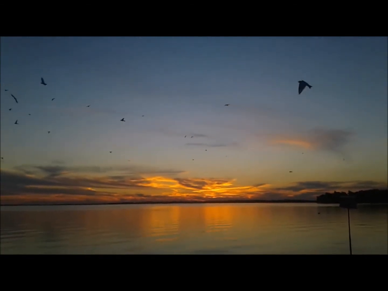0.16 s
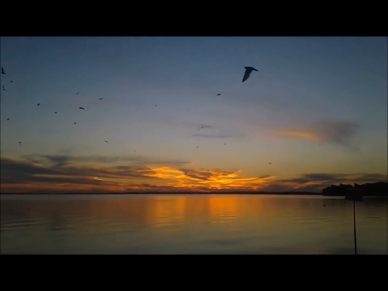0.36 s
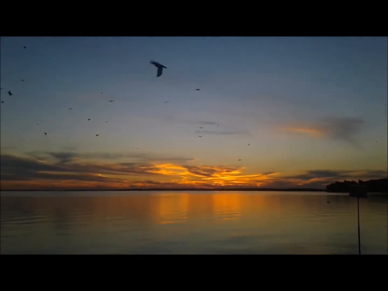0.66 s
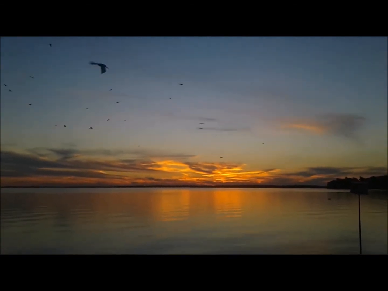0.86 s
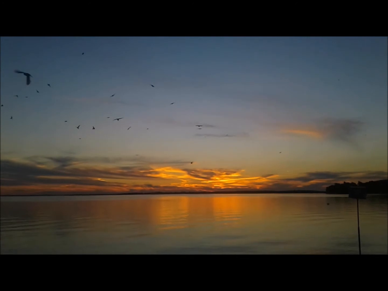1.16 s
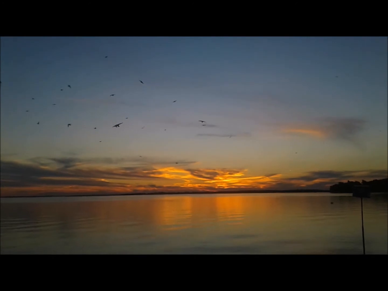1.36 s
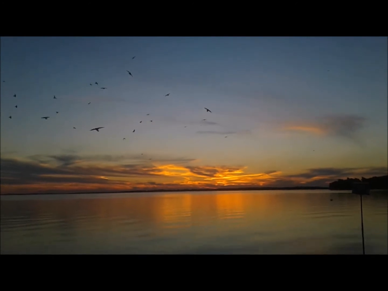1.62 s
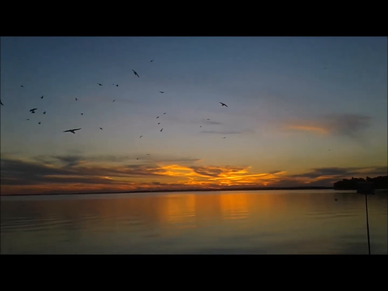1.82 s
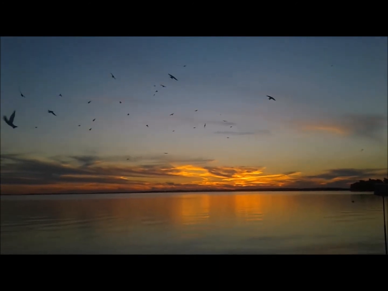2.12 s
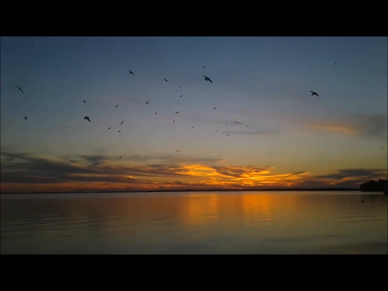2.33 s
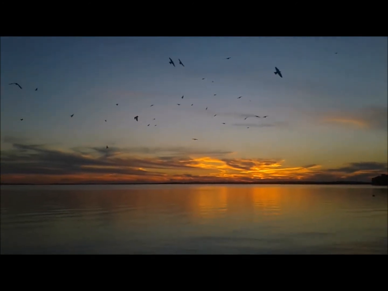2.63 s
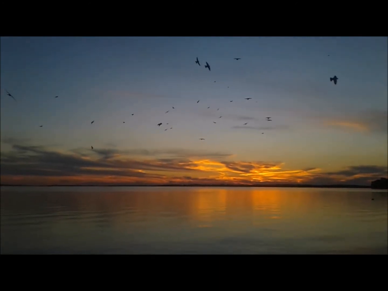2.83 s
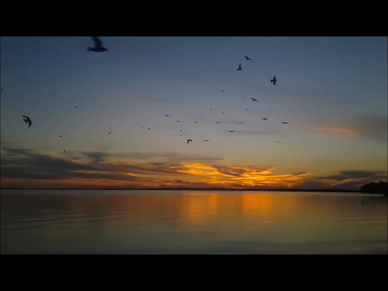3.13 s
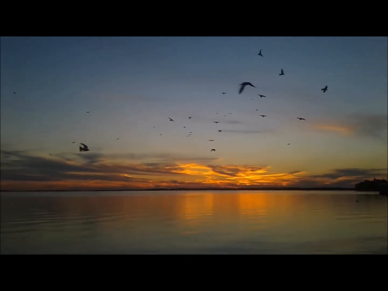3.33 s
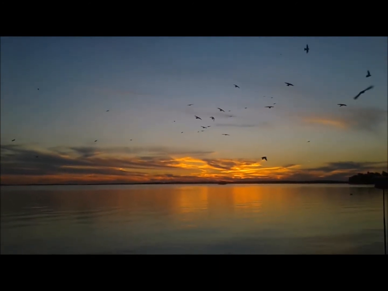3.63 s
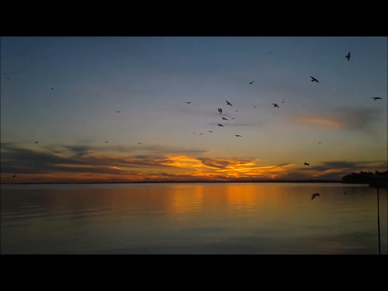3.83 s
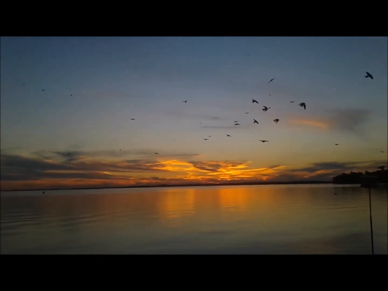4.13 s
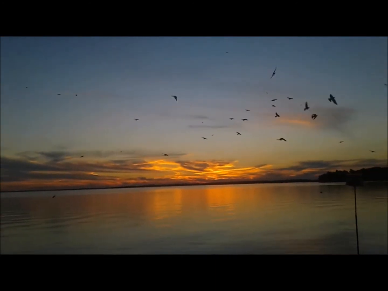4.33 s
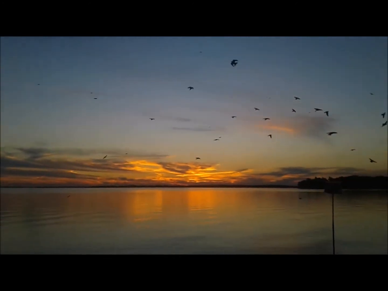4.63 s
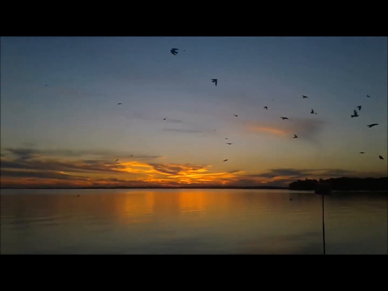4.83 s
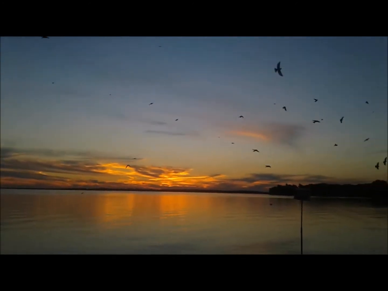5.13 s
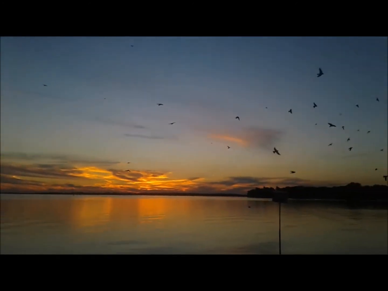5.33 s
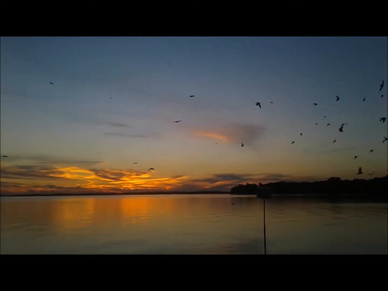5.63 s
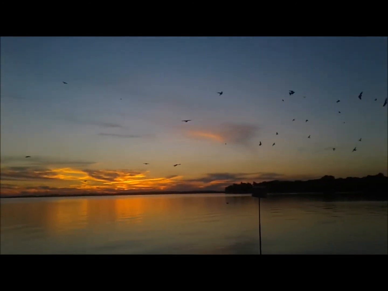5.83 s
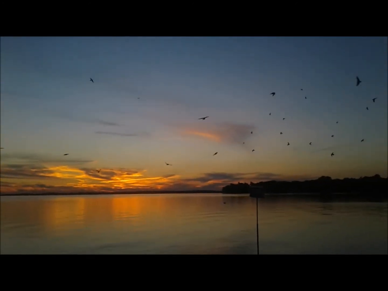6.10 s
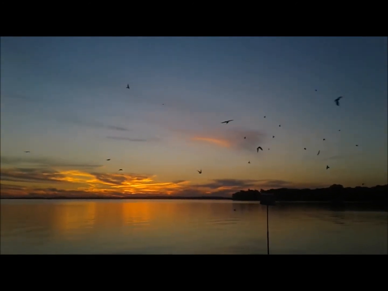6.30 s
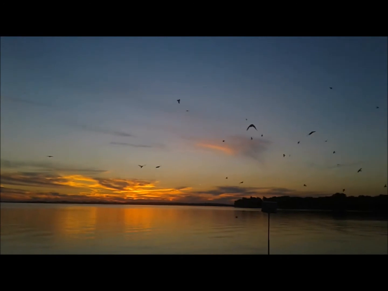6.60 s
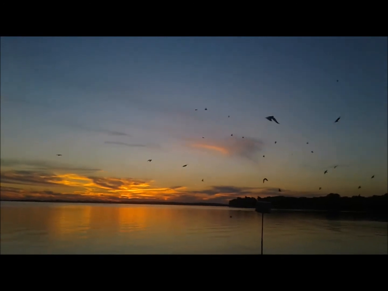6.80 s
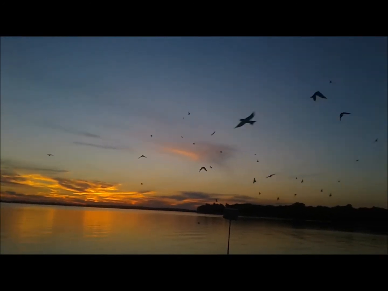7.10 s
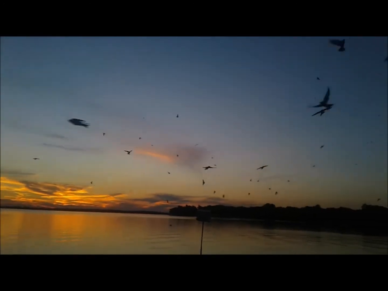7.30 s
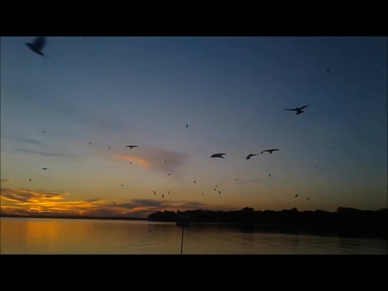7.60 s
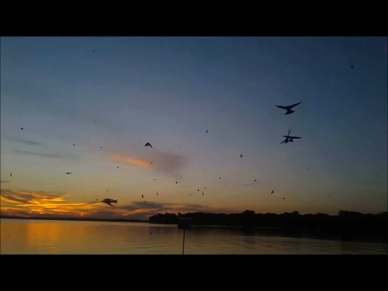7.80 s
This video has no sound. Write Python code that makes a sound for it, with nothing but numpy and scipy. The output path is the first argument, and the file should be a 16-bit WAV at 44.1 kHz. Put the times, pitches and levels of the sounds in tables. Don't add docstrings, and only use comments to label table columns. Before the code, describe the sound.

Dozens of small swallow-like birds call without pause over a calm lake in the open air. Short, burry, falling chirps overlap near and far, mixed with brief thin whistles and harsh rasps. The calls grow denser and louder toward the end, where rasps repeat regularly and come closer. Water and shore return a faint wash. Very quiet distant motor hum and low rumble lie beneath. Small stereo microphone in the middle of the flock, slight hiss.

```python
import sys
import numpy as np
from scipy import signal
from scipy.fft import rfft, irfft, next_fast_len
from scipy.io import wavfile
from scipy.ndimage import uniform_filter1d, map_coordinates

SR = 44100
rng = np.random.default_rng(int(sys.argv[2]) if len(sys.argv) > 2 else 0)


def level_to_linear(level):
    exponent = np.asarray(level, float) / 20
    return 10 ** exponent


def persist_wave(psi):
    counts = np.round(np.clip(psi, -1, 1) * 32767).astype(np.int16)
    wavfile.write(sys.argv[1], SR, np.atleast_2d(counts).T)


N = 350595


def curve(table, hz):
    points_hz, values = np.transpose(table)
    return np.interp(np.log(np.maximum(hz, 1)), np.log(points_hz), values)


def colour(x, table, share=1):
    length = x.shape[-1]
    size = next_fast_len(length)
    hz = np.arange(size // 2 + 1) * SR / size
    return irfft(rfft(x, size) * level_to_linear(share * curve(table, hz)), size)[..., :length]


def level(x, db):
    return x * level_to_linear(db) / np.sqrt(np.mean(x ** 2))


def walk(rate_hz, size):
    hold = max(int(SR / rate_hz), 1)
    steps = np.repeat(rng.standard_normal(size // hold + 1), hold)
    return 1.3 * uniform_filter1d(uniform_filter1d(steps, hold), hold)[:size]


def swell(u, rise, fall):
    opening = np.sin(np.pi / 2 * np.clip(u / rise, 0, 1)) ** 2
    closing = np.sin(np.pi / 2 * np.clip((1 - u) / fall, 0, 1)) ** 2
    return opening * closing


def seconds():
    return np.arange(N) / SR


# (frequency [Hz], level [dB per Hz])
RUMBLE_COLOUR = [(15, -53), (25, -25), (53, -10), (91, -3.5), (134, -7.5), (196, -5.5), (329, -1),
                 (400, -6.5), (505, -8), (563, -10.5), (749, -10.5), (1240, -13.5), (1400, -23),
                 (1530, -18.5), (1800, -33), (2340, -70), (3960, -120)]
# (frequency [Hz], left-right correlation [0-1])
LIKENESS = [(25, 0.4), (60, 0.85), (150, 0.75), (350, 0.94), (700, 0.49), (1500, 0.029)]


def rumble():
    size = next_fast_len(N)
    hz = np.arange(size // 2 + 1) * SR / size
    like = np.clip(curve(LIKENESS, hz), 0, 1)
    noise = rfft(rng.standard_normal((2, size))) * level_to_linear(curve(RUMBLE_COLOUR, hz))
    mid, side = noise * np.sqrt([1 + like, 1 - like])
    ports = np.array([mid + side, 0.89 * (mid - side)])
    growth_db = 2.5 * np.arange(N) / N
    out = 0
    for octave in np.arange(4, 12):
        band = np.clip(1 - abs(np.log2(np.maximum(hz, 1)) - octave), 0, 1)
        drift_db = 0.65 * walk(2.5, N) + (octave > 7) * growth_db
        out = out + level_to_linear(drift_db) * irfft(band * ports, size)[:, :N]
    return level(out, -49.5)


# (frequency [Hz], level [dB], pitch wander [Hz])
HUM = [
    (116.6, -64, 7.2),
    (239.8, -57.5, 0.4),
    (315.2, -62, 5.12),
    (612, -71.5, 6.),
    (166, -66.5, 4),
    (768, -69.5, 12.),
    (939, -70, 14),
]


def engines():
    out = 0
    for hz, db, wander_hz in HUM:
        strength = np.sqrt(2) * level_to_linear(db + 3.74 * walk(8.3, N))
        out = out + strength * np.sin(2 * np.pi * np.cumsum(hz + wander_hz * walk(1.5, N)) / SR)
    return out


def shore(birds):
    t60_s, wash_db = 0.53, -12
    t = np.arange(int(.6 * SR)) / SR
    tail = rng.standard_normal((2, len(t))) * level_to_linear(-60 * t / t60_s) * np.clip(t / .03, 0, 1)
    tail = tail / np.sqrt(np.sum(tail ** 2) / 2)
    tail = colour(tail, [(1500, 3.0), (2500, -4.5), (3600, 1.5), (4600, -2.0), (8000, 2.5)])
    return level_to_linear(wash_db) * signal.fftconvolve(birds, tail, axes=1)[:, :N]


def add(out, call, s, lead_ms, pan_db=0.):
    mirror_db, mirror_ms, drift_ms_per_s = -4, 5., 2.5
    size = next_fast_len(len(call) + 2 ** 10)
    turn = -2j * np.pi * np.arange(size // 2 + 1) / size * SR / 1000
    late_ms = mirror_ms * (.3 + rng.random()) + .12 * rng.standard_normal(2)
    start = int(s * SR) - SR // 1000
    climb = 1 + np.sign(late_ms[0] - late_ms[1]) * drift_ms_per_s / 1000
    mirrored = map_coordinates(call, [np.arange(len(call)) * climb], order=1)
    direct, mirror = rfft(call, size), level_to_linear(mirror_db) * rfft(mirrored, size)
    for ear, side in enumerate((-1, 1)):
        path = np.exp(turn * (1 + side * lead_ms / 2))
        heard = irfft(path * (direct + mirror * np.exp(turn * late_ms[ear])), size)
        heard = heard[max(-start, 0):N - start] * level_to_linear(-side * pan_db / 2)
        out[ear, max(start, 0):max(start, 0) + len(heard)] += heard


# (multiple of the pitch, level [dB])
OVERTONES = [(2, -22.5), (3, -35), (4, -42)]


def chirp(length, start_hz, end_hz, db, bend=1, arch_hz=0):
    size = int(length * 1.06 * SR)
    u = np.arange(size) / size
    offset, pace, width = rng.random(3)
    trill_hz, swing_hz, trill_depth = 135.52, 197, 0.43
    trill_hz = trill_hz * (.86 + .28 * pace + .1 * walk(60, size))
    trill = 2 * np.pi * (offset + np.cumsum(trill_hz) / SR)
    slide = 1 - (1 - u) ** bend - 0.0754 * np.sin(2 * np.pi * u)
    scoop_hz = 250 * np.exp(-u * length / 0.00873)
    glide = start_hz + (end_hz - start_hz) * slide + arch_hz * np.sin(np.pi * u ** 0.5) - scoop_hz
    effort = np.clip(1 + (db + 27) / 30, .55, 1.1)
    roughness = 1 + 4 * np.clip((start_hz + arch_hz) / 1000 - 4.3, 0, 1)
    swing_hz = swing_hz * np.clip(glide / 3100, .45, 1.1) * effort * (.8 + .4 * width)
    ragged_hz = 34 * walk(300, size) + 28 * (roughness - 1) * walk(1200, size)
    hz = glide + swing_hz * np.sin(trill) + ragged_hz
    phase = 2 * np.pi * np.cumsum(hz) / SR
    overtones = sum(level_to_linear(d) * np.sin(k * phase) * (k * hz < .45 * SR) for k, d in OVERTONES)
    beak_db = -12. * u + 3.35 * walk(45.0, size) + 7.8 * (width - 2.0)
    tone = np.sin(phase) + level_to_linear(beak_db) * overtones
    flutter = (1 - trill_depth * np.sin(trill + 1.42)) * level_to_linear(2.0 * walk(74.2, size))
    flutter = flutter + 0.097 * walk(1500, size)
    breath = swell(u, 0.13, 0.2) * (1 - 0.32 * np.cos(2 * np.pi * u)) * level_to_linear(-3 * u)
    return level(tone * flutter * breath, db)


# (time [s], level [dB])
FAR_FLOCK = [(0., -30), (.44, -48.5), (.62, -37.5), (1.45, -46.5), (1.95, -46), (2.2, -44.5), (2.4, -55.5),
             (2.9, -40.5), (3.3, -66.5), (3.452, -24), (3.83, -47.5), (3.98, -28.5), (4.3, -46.5),
             (5.05, -50), (5.38, -32.5), (5.62, -43), (6.22, -42.5), (7.02, -32), (7.62, -44), (7.95, -30)]


def far_birds(count=75):
    out = np.zeros((2, N))
    for slot, (shift, long, high, low, loud, side) in enumerate(rng.random((count, 6))):
        call = chirp(0.15 + .1 * long, 3200 + 900 * high, 2100 + 900 * low, 4 * loud)
        add(out, call, (slot + shift) * N / SR / count, 1.16 * (side - .5))
    out = out + level_to_linear(23.5) * shore(out)
    out = colour(out, [(1500, 14.5), (2500, -2.5), (4000, -14), (5000, -1), (7000, -7.5)])
    return level(out, 0) * level_to_linear(np.interp(seconds(), *np.transpose(FAR_FLOCK)) - 4.5)


def whistle(length, start_hz, end_hz, db):
    u = np.arange(int(length * SR)) / int(length * SR)
    hz = end_hz + (start_hz - end_hz) * (1 - u) ** 1.3
    breath = swell(u, 0.42, 0.34) * level_to_linear(2.5 * walk(97, len(u)))
    return level(np.sin(2 * np.pi * np.cumsum(hz) / SR) * breath, db - 4.0)


# (time [s], length [s], start pitch [Hz], end pitch [Hz], level [dB])
WHISTLES = [(0.429, 0.02, 4460, 4560, -45), (0.435, .016, 2200, 2500, -43), (.535, 0.044, 4700, 4250, -52),
            (1.522, 0.046, 2360, 2180, -48), (1.663, 0.032, 2620, 2120, -47),
            (3.621, 0.031, 2880, 1925, -39), (3.667, 0.042, 2410, 1990, -49),
            (3.72, 0.023, 2300, 2000, -57), (3.779, 0.019, 2550, 2950, -37.5),
            (3.825, 0.035, 2670, 1920, -45), (3.87, 0.032, 2280, 1930, -47.5),
            (4.433, .03, 6400, 5060, -58.5), (4.448, 0.044, 5080, 4200, -45), (4.5, .026, 2740, 2400, -50),
            (5.246, 0.053, 5800, 3950, -47)]


def whistles(out):
    for s, length, start_hz, end_hz, db in WHISTLES:
        add(out, whistle(length, start_hz, end_hz, db), s, 0.)


# (frequency [Hz], level [dB per Hz])
RASP_COLOUR = [(530, -57), (900, -29), (1300, -22.5), (1750, -12.5), (1950, -13), (3100, -3.5), (4300, 0.5),
               (5150, -9.5), (5900, -23.5), (6900, -28.5), (8600, -23), (10400, -38), (13300, -39),
               (15600, -41)]


def rasp(length, db, tilt_db):
    size = int(length * 1.355 * SR)
    u = np.arange(size) / size
    cycle = np.cumsum(240 * (1 + .15 * walk(120, size))) / SR
    puffs = (.35 + np.exp(-(cycle % 1) / .35)) * level_to_linear(1.8 * walk(110, size))
    air = rng.standard_normal(size)
    air = air * swell(u, 0.29, 0.63) + 0.47 * uniform_filter1d(air, size=4)
    voice = level(colour(puffs * air, RASP_COLOUR), db + 5.5)
    core_hz = 4540 - 500 * (2 * u - 1) ** 2 + 200 * walk(500, size)
    voice = voice + level(puffs * np.sin(2 * np.pi * np.cumsum(core_hz) / SR), db - 7.5)
    voice = colour(voice, [(1250, -2 * tilt_db), (5000, 0), (20000, 2 * tilt_db)])
    return voice * swell(u, 0.11, 0.36)


# (time [s], length [s], level [dB], left minus right [dB], tilt [dB per octave])
RASPS = [(.009, 0.12, -40, -1, -2.5), (0.639, 0.087, -45, -4, -1), (2.603, 0.14, -57, 1.5, 12.5),
         (3.314, 0.18, -50, -2.5, 5), (3.871, 0.11, -51.5, -0.5, 3.5), (4.521, 0.086, -57.5, 1, -11),
         (4.939, 0.12, -42, -0.5, -0.5), (5.286, 0.14, -42, 0, -1.7), (5.781, 0.11, -39.5, 2, -0.3),
         (6.205, 0.1185, -39, 2, -2.5), (6.56, 0.12, -40, 1.5, -1), (6.972, 0.11, -37.5, 1, 0),
         (7.292, 0.11, -34.5, 1, 0.4), (7.641, 0.13, -32, 1.5, 1.5)]


def rasps(out):
    for s, length, db, pan_db, tilt_db in RASPS:
        add(out, rasp(length, db, tilt_db), s - .005, 0.15, pan_db)


def place(out, call, s, lead_ms):
    add(out, call, s - .008, lead_ms, 0.2 + 2.5 * lead_ms)


# (time [s], length [s], start pitch [Hz], level [dB])
MURMURS = [(0.197, 0.18, 1934, -53.5), (0.628, 0.093, 1910, -42), (0.795, 0.099, 2531, -43),
           (1.21, 0.053, 1950, -51.5), (1.335, 0.05, 2240, -45), (2.03, 0.06, 1950, -48.5),
           (2.8, 0.0655, 1835, -46.5), (3.298, 0.071, 1880, -49.5), (3.996, 0.16, 2337, -45.5),
           (5.01, 0.084, 1843, -46.5), (5.866, 0.036, 1820, -50), (6.74, 0.063, 2880, -55),
           (7.042, 0.062, 1750, -46.5), (7.698, 0.066, 1744, -43.5)]


def murmurs(out):
    for s, length, start_hz, db in MURMURS:
        place(out, chirp(length, start_hz, .88 * start_hz, db), s, 0.062)


# (time [s], length [s], start pitch [Hz], end pitch [Hz], level [dB])
CHATTER = [(.055, 0.063, 3510, 3760, -34.5), (.27, 0.12, 3970, 3700, -47), (.621, 0.18, 4040, 2375, -23),
           (.628, 0.071, 3300, 3080, -36), (1.04, 0.14, 2480, 2100, -44.5),
           (2.45, 0.079, 3850, 3260, -41.5), (2.59, 0.092, 3170, 2870, -36),
           (2.62, 0.085, 2156, 1866, -44.5), (2.74, 0.07, 2700, 2350, -37),
           (2.905, 0.057, 3690, 3500, -42.5), (2.97, .1, 2740, 2420, -39), (3.34, 0.18, 2400, 2180, -38.5),
           (3.9, 0.11, 2585, 2287, -38), (4.35, .045, 2950, 3250, -42), (4.42, 0.097, 3286, 2840, -31.5),
           (6.012, 0.095, 4290, 3550, -34), (6.85, 0.17, 3150, 3030, -39.5), (.505, 0.036, 5120, 4820, -51),
           (4.512, 0.086, 3320, 3200, -36.5), (7.155, .055, 3260, 3730, -35), (1.48, .11, 5070, 3980, -53),
           (2.62, 0.049, 3750, 3620, -34.5), (6.04, .1, 3440, 2870, -40.5)]
# (time [s], length [s], start pitch
# [Hz], end pitch [Hz], level [dB])
ARCHES = [
    (.03, .09, 3900, 3900, -35.5),
    (4.96, .1, 3900, 3680, -50),
    (5.3, 0.13, 4700, 4400, -46),
    (6.235, 0.1, 3600, 3650, -39),
    (6, 0.079, 3700, 3500, -33),
    (8.3, 0.11, 3650, 3800, -30.5),
    (1.085, 0.083, 4250, 4200, -46),
    (1.433, 0.087, 4550, 4600, -46.5),
    (7.374, .165, 2750, 2230, -24.5),
    (3.33, 0.15, 4150, 3700, -42),
]


def chatter(out):
    for table, arch_hz in ((CHATTER, 0), (ARCHES, 693)):
        for s, length, start_hz, end_hz, db in table:
            add(out, chirp(length, start_hz, end_hz, db, arch_hz=arch_hz), s - .008, 0.053, 0.2)


# (time [s], length [s], start pitch [Hz], level [dB], left leads [ms])
HOLDS = [(.435, 0.063, 5800, -51, 0.24), (.692, .13, 3646, -31.5, -0.12), (2.012, 0.044, 2640, -41, 0.216),
         (3.264, 0.095, 3690, -32.5, 0), (3.497, 0.085, 4300, -42.5, 0.22), (4.075, .11, 4260, -45.5, 0.43),
         (5.04, 0.12, 3685, -34.5, 0.17), (5.105, 0.084, 2420, -47.5, 0.054), (5.81, 0.1, 4120, -36, -0.28),
         (5.885, 0.081, 3506, -30, -0.18), (6.35, 0.118, 3520, -38, -0.084),
         (7.632, 0.14, 3490, -23, -0.28)]
# (time [s], length [s], start pitch [Hz], level [dB], left leads [ms])
SAGS = [(0., 0.074, 3530, -38, 0.34), (.117, 0.22, 4040, -46.5, 0.07), (.476, 0.16, 3580, -33.5, 0.56),
        (1.864, 0.088, 4210, -42, -0.013), (1.939, 0.078, 3930, -37.5, -0.14),
        (3., 0.079, 3326, -31.5, -0.69), (3.33, 0.57, 4700, -57.5, 0.25), (3.556, 0.1, 3713, -30, 0.29),
        (3.705, 0.1, 4140, -36, -0.069), (3.885, 0.1, 5340, -41.5, 0.14), (3.948, 0.13, 3760, -31, -0.182),
        (4.699, 0.16, 3650, -34, -0.38), (4.718, 0.088, 4760, -52, -.1), (5.216, 0.098, 3760, -33, -0.19),
        (5.334, 0.1213, 3785, -21.5, -0.329), (5.444, 0.087, 4270, -33.5, -.83),
        (5.56, 0.089, 3120, -46, -0.036), (5.758, 0.13, 3120, -39.5, 0.029),
        (6.115, 0.08, 4160, -44, 0.154), (6.133, 0.12, 3300, -35, -0.23), (6.696, 0.11, 4200, -36, -0.195),
        (7.198, 0.08, 3690, -24.5, -0.078)]
# (time [s], length [s], start pitch [Hz], level [dB], left leads [ms])
HALF_DIVES = [(1.418, 0.12, 3600, -51, 0.26), (1.997, 0.12, 5300, -48.5, 0.085),
              (2.664, 0.0974, 2186, -41.5, 0.098), (3.057, 0.11, 3450, -54.5, 0.57),
              (3.4, 0.12, 3596, -27, -0.046), (3.785, 0.1, 3290, -31.5, -0.12),
              (4.05, 0.11, 3590, -35, -0.061), (4.474, 0.099, 3884, -28.5, -0.153),
              (4.578, 0.15, 3636, -34, -0.24), (4.796, 0.098, 2560, -47, 0.13),
              (6.384, 0.18, 3780, -44, -0.25), (6.64, 0.11, 3386, -28, -0.38),
              (7.86, 0.13, 3650, -39, -0.042)]


def partial_dives(out):
    for table, end_share in ((HOLDS, 0.9376), (SAGS, .89), (HALF_DIVES, .78)):
        for s, length, start_hz, db, lead_ms in table:
            place(out, chirp(length, start_hz, end_share * start_hz, db), s, lead_ms)


# (time [s], length [s], start pitch [Hz], level [dB], left leads [ms])
SWOOPS = [
    (1.058, 0.16, 4057, -28, 0.033),
    (2.39, 0.14, 4110, -26, 0.018),
]


def swoops(out):
    for s, length, start_hz, db, lead_ms in SWOOPS:
        place(out, chirp(length, start_hz, 0.67 * start_hz, db, bend=1.7), s, lead_ms)


# (time [s], length [s], start pitch [Hz], level [dB], left leads [ms])
FAR_DIVES = [(0.113, 0.1613, 3360, -34.5, 0.32), (0.211, 0.14, 3580, -39.5, -0.022),
             (0.411, 0.16, 3380, -35.5, 0.42), (0.84, 0.14, 3434, -33.5, 0.24),
             (0.977, 0.15, 3270, -31.5, 0.53), (1.421, 0.19, 2805, -45, 0.66),
             (1.745, 0.145, 3900, -36.5, 0.075), (2.529, 0.23, 3850, -35, 0.47),
             (2.562, 0.076, 3010, -31, 0.19), (2.763, 0.1883, 3867, -33, 0.086),
             (2.865, 0.0934, 3320, -35.5, 0.069), (3.422, 0.19, 3190, -43, -0.29),
             (3.825, 0.14, 2997, -30, 0.012), (4.174, 0.16, 3630, -33, -0.19),
             (5.937, 0.094, 2800, -41, -0.15), (6.051, 0.11, 2850, -38, -0.21),
             (7.085, 0.11, 3060, -32, 0.64)]
# (time [s], length [s], start pitch [Hz], level [dB], left leads [ms])
NEAR_DIVES = [(1.212, 0.21, 3562, -26.5, 0.22), (1.64, 0.18, 3830, -25.5, 0),
              (2.014, 0.17, 3703, -27, 0.22), (2.444, 0.2, 3576, -26.5, -0.15),
              (2.61, 0.17, 3700, -28, 0.12), (2.934, .14, 3575, -30.5, -0.76), (3.305, 0.14, 3597, -24, 0),
              (3.992, 0.19, 3687, -27.5, -0.13), (4.376, 0.13, 3484, -29, -.35),
              (4.664, 0.14, 3515, -28, -0.62), (5.14, 0.15, 3505, -28, -0.16), (5.41, 0.14, 3080, -27, 0),
              (6.239, 0.16, 3673, -21, -0.6), (6.801, 0.18, 3264, -28.5, 0),
              (7.008, 0.1, 3570, -24.5, 0.071), (7.769, 0.15, 3480, -22.5, -0.21)]


def dives(out):
    floor_hz, full_s, shortfall_hz_per_s = 2199, .18, 3030
    for table in (FAR_DIVES, NEAR_DIVES):
        for s, length, start_hz, db, lead_ms in table:
            end_hz = floor_hz + shortfall_hz_per_s * (full_s - length)
            place(out, chirp(length, start_hz, end_hz, db), s, lead_ms)


# (frequency [Hz], level [dB])
BEAK = [(4200, -3), (5500, -3), (7500, 5), (10000, -2.5), (14000, 0)]


def near_birds():
    out = np.zeros((2, N))
    for calls in (murmurs, chatter, partial_dives, swoops, dives):
        calls(out)
    out = colour(out, BEAK)
    whistles(out)
    rasps(out)
    return out


# (frequency [Hz], left minus right [dB])
EAR_TILT = [(1500, -1.5), (2300, -3), (3300, 5), (4000, 3), (4800, -4.5), (6000, 0), (8000, 10),
            (13000, -2)]
# (time [s], left minus right [dB])
TURN = [
    (0, -1.5),
    (4, -1.2),
    (7.95, -3),
]


def ears(x):
    turn_db = np.interp(seconds(), *np.transpose(TURN))
    left = colour(x[0], EAR_TILT, .5) * level_to_linear(turn_db / 2)
    right = colour(x[1], EAR_TILT, -.5) * level_to_linear(-turn_db / 2)
    return np.array([left, right])


def scene():
    birds = near_birds()
    return ears(birds + shore(birds) + far_birds()) + rumble() + engines()


# (frequency [Hz], level [dB per Hz])
HISS = [(1500, 5.5), (4000, 4), (8000, -10.5), (12000, -13), (16000, -11.5)]


def preamp(dry):
    limit = .6
    hiss = level(colour(rng.standard_normal((2, N)), [(700, -46.5), *HISS]), -58)
    return limit * np.tanh((dry + hiss) / limit)


def band_limit(x):
    return signal.sosfilt(signal.butter(12, 15700, fs=SR, output="sos"), x)


def record(dry):
    mix = preamp(dry)
    return band_limit(mix)


dry = scene()
out = record(dry)
persist_wave(out)
```